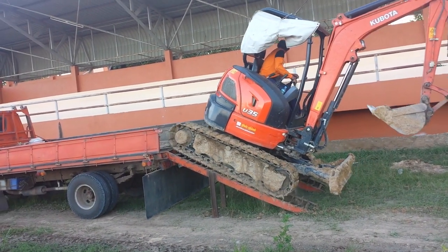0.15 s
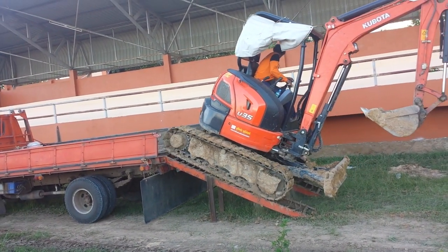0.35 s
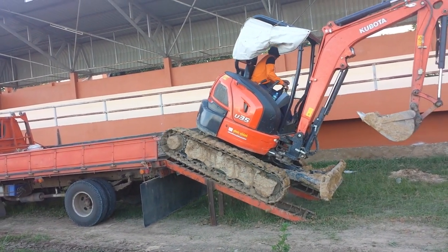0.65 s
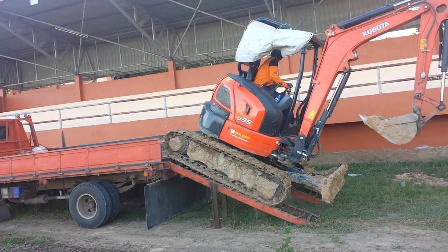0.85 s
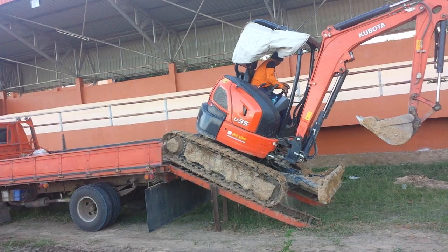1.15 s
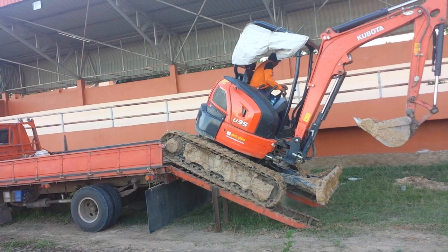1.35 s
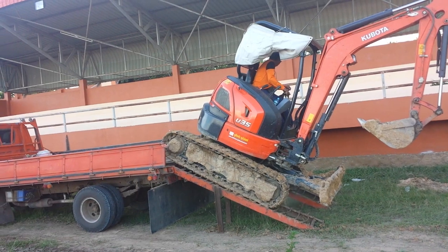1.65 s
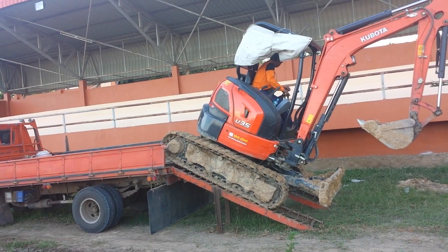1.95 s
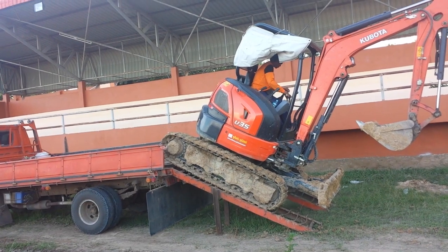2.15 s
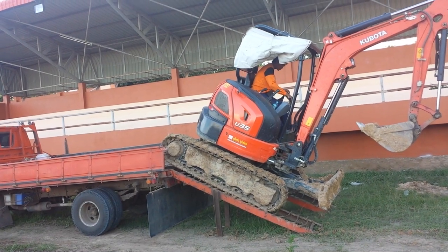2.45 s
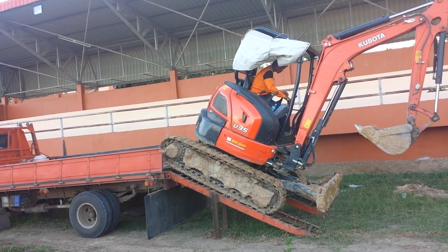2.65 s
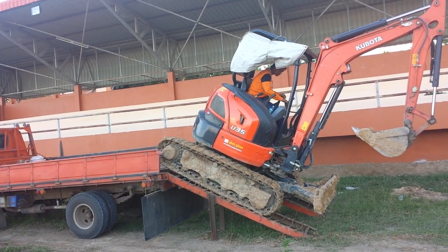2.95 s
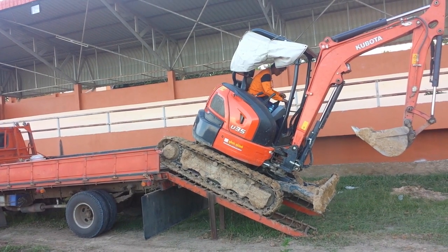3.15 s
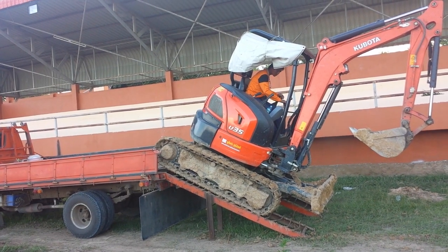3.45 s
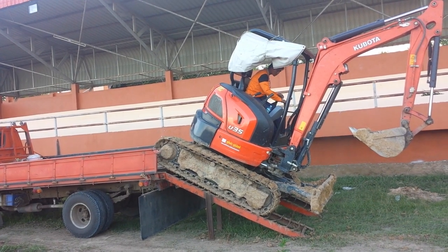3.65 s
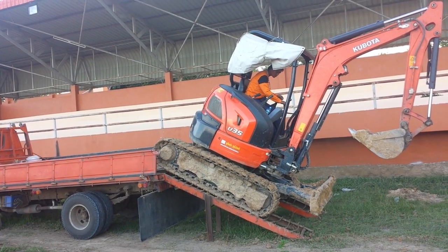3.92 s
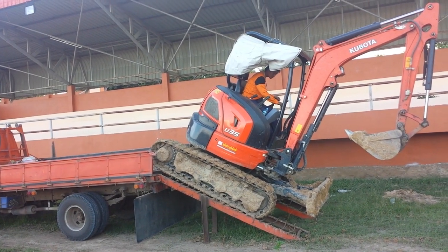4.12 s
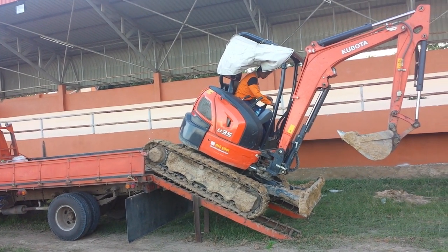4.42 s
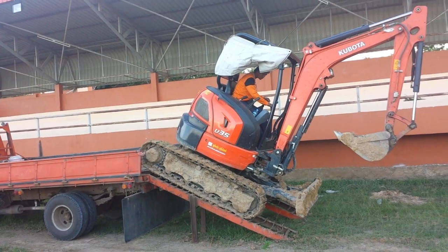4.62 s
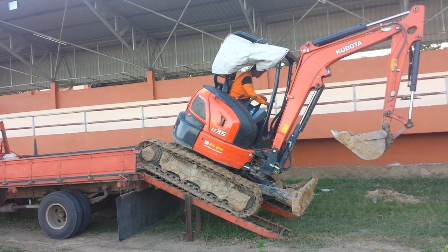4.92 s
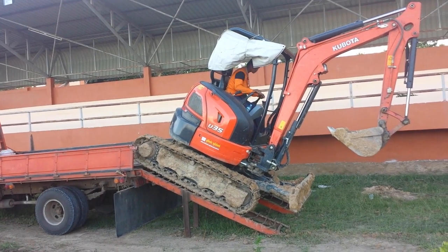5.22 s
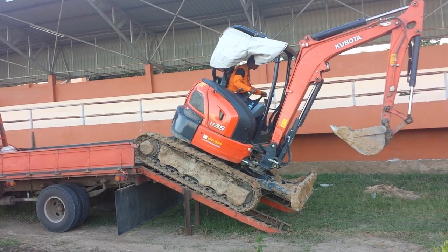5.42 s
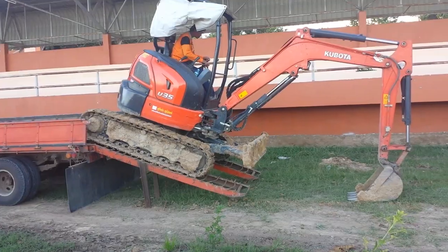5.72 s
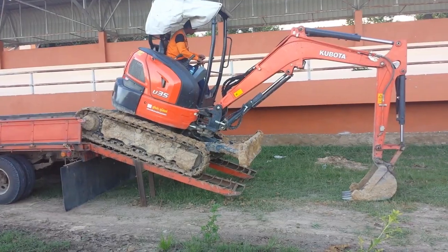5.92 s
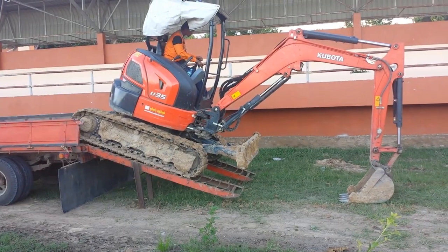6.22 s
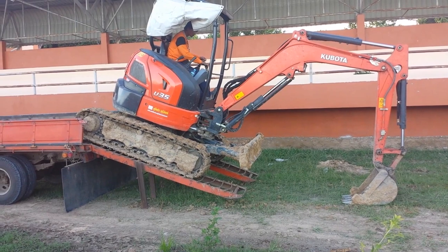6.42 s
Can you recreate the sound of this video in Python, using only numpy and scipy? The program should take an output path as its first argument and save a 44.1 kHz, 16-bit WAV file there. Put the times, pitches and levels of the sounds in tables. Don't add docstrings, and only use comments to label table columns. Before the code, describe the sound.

Metal tracks bang and grate early over a subdued diesel rattle, which swells into a steady hissing roar, broken by a short silence near the end.

```python
import sys
import numpy as np
from scipy import signal
from scipy.fft import rfft, irfft, next_fast_len
from scipy.io import wavfile
from scipy.ndimage import uniform_filter1d, map_coordinates

SR = 44100
rng = np.random.default_rng(int(sys.argv[2]) if len(sys.argv) > 2 else 0)


def rack_gain(trim_db):
    fader = np.asarray(trim_db, float)
    return 10 ** (fader / 20)


def transcribe(signal):
    frames = np.atleast_2d(signal).T
    limited = np.clip(frames, -1, 1)
    pcm = np.round(limited * 32767).astype(np.int16)
    wavfile.write(sys.argv[1], SR, pcm)


N = 289737
TIME = np.arange(N) / SR


def unit(x):
    return x / np.sqrt(np.mean(x ** 2) + 1e-20)


def along(points, hz):
    f, v = np.transpose(points)
    return np.interp(np.log(hz + 1), np.log(f + 1), v)


def curves(rows):
    s, *cols = np.transpose(rows)
    return [np.interp(TIME, s, c) for c in cols]


def wobble(rate_hz):
    knots = rng.standard_normal(int(N * rate_hz / SR) + 4)
    return map_coordinates(knots, [TIME * rate_hz])


def filtered(x, response):
    n = x.shape[-1]
    m = next_fast_len(n + 4096)
    return irfft(rfft(x, m) * response(np.fft.rfftfreq(m, 1 / SR)), m)[..., :n]


def modes(table):
    def response(f):
        total = 0
        for k, (hz, width, db) in enumerate(table):
            total = total + (-1) ** k * rack_gain(db) * 1j * f * width / (hz * hz - f * f + 1j * f * width)
        return total
    return response


def colour(points):
    below, above = (points[0][0] * 0.6, -120), (points[-1][0] * 1.3, -120)
    return lambda f: rack_gain(along([below] + list(points) + [above], f))


def patchy(patchy_db):
    z = signal.stft(rng.standard_normal((2, N)), nperseg=512)[2]
    field = uniform_filter1d(rng.standard_normal(z.shape[1:]), 6, 0)
    field = uniform_filter1d(field, 8, 1)
    return signal.istft(z * rack_gain(patchy_db * unit(field)), nperseg=512)[1][:, :N]


# start_s, cycle_rate_hz (four-stroke cycles)
CYCLE_RATE = [(0, 18.33), (1, 18.38), (2.2, 18.36), (2.65, 18.88), (3.4, 18.53), (4.2, 18.37), (5.6, 18.3),
              (5.97, 18.22), (6.57, 18.28)]
ORDER_LEVELS = [0.5, -28, -20, -11, -17.5, -22, -21, -28, -4.5, -13.5, -23.5, -19, -8, -10, -31.5, -20.5,
                -6, -3.5, -11, -7, -12, -13.5, -10.5]


def engine_tones(turn):
    tones = np.zeros(N)
    for order, db in enumerate(ORDER_LEVELS, 3):
        loose = 0.05 if order == 3 else 1
        phase = 2 * np.pi * (order * turn + rng.random()) + loose * 0.21 * wobble(5)
        level_db = db + loose * 3.4 * wobble(12)
        tones += rack_gain(level_db) * np.sqrt(2) * np.sin(phase)
    return tones


FIRING_STRENGTH = [0.51, 0.64, 0.52]
# pitch_hz, level_db (per Hz)
ROAR_COLOUR = [(28, -32), (42, -13), (85, -11), (125, -3.5), (160, -6), (210, -5), (300, -6.5), (380, -4.5),
               (450, -5), (580, -18.5), (720, -7.5), (830, -5), (1000, -17.5), (1300, -16.5)]
# pitch_hz, level_db (per Hz)
HISS_COLOUR = [(1400, -4), (1900, 3.5), (2250, -0.5), (2500, -7.5), (3700, -11.5), (5100, -11), (6500, -11),
               (7000, -3), (7500, -14.5), (9000, -21), (10000, -22), (12000, -26.5), (14300, -28),
               (15500, -43.5)]
# pitch_hz, width_hz, level_db
OIL_MODES = [(7100, 2200, 0)]


def engine_noise(turn, effort, ducked_db):
    strength = np.take(FIRING_STRENGTH, (3 * turn).astype(int) % 3)
    burst = strength * np.exp(-(3 * turn % 1) / 0.12)
    burst = burst / burst.mean() - 1

    def low(f, hz):
        return 1 / (1 + (f / hz) ** 8)

    hiss_colour = colour(HISS_COLOUR)
    roar = unit(filtered((1 + 0.04 * burst) * patchy(1.0), colour(ROAR_COLOUR)))
    knock = unit(filtered((1 + 0.09 * burst) * patchy(0.87), lambda f: hiss_colour(f) * low(f, 2800)))
    air = (1 + 0.02 * burst) * patchy(0.62)
    hiss = filtered(air, lambda f: hiss_colour(f) * (low(f, 7600) - low(f, 2250)))
    sizzle = filtered(air, lambda f: hiss_colour(f) * (1 - low(f, 7270)))
    oil = unit(filtered(patchy(1.5), lambda f: modes(OIL_MODES)(f) ** 2))

    bright = unit(hiss + rack_gain(2.5 * effort) * sizzle)
    hiss_db = -0.01 - 2 * effort + 0.06 * ducked_db
    noise = rack_gain(-1.06 + 7.0) * roar + rack_gain(hiss_db) * (rack_gain(-3) * knock + rack_gain(-0.5) * bright)
    return noise + rack_gain(-20 + 14 * effort) * oil


# pitch_hz, level_db
PUMP_WHINE = [(1104, -52)]
# centre_s, level_db, pitch_hz, half_length_s
CHASSIS_GROANS = [
    (3.93, -23.5, 117, 0.15),
    (6.22, -24.5, 172, 0.098),
    (2.566, -22.5, 430, 0.088),
]


def hum():
    out = np.zeros(N)
    for hz, db in PUMP_WHINE:
        level_db = db + 1.5 * wobble(3)
        out += rack_gain(level_db) * np.sqrt(2) * np.sin(2 * np.pi * hz * TIME + 0.3 * wobble(8))
    for s, db, hz, half_s in CHASSIS_GROANS:
        swell = np.exp(-((TIME - s) / half_s) ** 2)
        out += rack_gain(db) * swell * np.sqrt(2) * np.sin(2 * np.pi * hz * TIME)
    return out


# start_s, level_db
GAIN_RIDE = [(0, -33.5), (.16, -35), (.26, -43), (.4, -35), (.65, -35.5), (.87, -42.5), (1.25, -36.5),
             (1.5, -38.5), (1.95, -37.5), (2.1, -33.5), (2.25, -29), (2.45, -27), (2.7, -27), (4, -27),
             (5.6, -26.5), (5.97, -27.5), (6.57, -27)]
# start_s, effort_share
PRESSURE = [(0, 0.38), (2.2, .1), (3.5, .2), (4.5, 0.6), (4.9, .95), (5.6, .9), (5.97, .6), (6.57, .9)]


def engine():
    tone_db, = curves(GAIN_RIDE)
    effort, = curves(PRESSURE)
    ducked_db = tone_db.max() - tone_db
    turn = np.cumsum(curves(CYCLE_RATE)[0]) / SR
    noise = engine_noise(turn, effort, ducked_db)
    tones = engine_tones(turn) * rack_gain(-0.36 - 0.17 * ducked_db)
    steady = hum()
    return rack_gain(tone_db) * (noise + [tones, 0 * tones]) + [steady, 0 * steady]


# pitch_hz, level_db (per Hz)
GROUND_COLOUR = [(65, -8), (90, -4), (160, 0), (250, -3.5)]


def ground():
    rumble = unit(filtered(rng.standard_normal(N), colour(GROUND_COLOUR)))
    apart = rack_gain(curves(GAIN_RIDE)[0] - 11.5) * rumble
    return np.array([apart, -apart])


# pitch_hz, level_db (per Hz)
GRIT_COLOUR = [(2500, -2), (3600, -4.5), (4700, -3.5), (6100, -4.5), (7500, -2.5), (8500, -15.5),
               (10500, -17.5), (13000, -37.5), (15500, -38)]


def struck(table, t, rise_s, rasp=0):
    decay = rack_gain(-60 * t / 0.06) + 7 * rack_gain(-60 * t / 0.007)
    contact = rng.standard_normal((2, len(t))) * decay * (1 - np.exp(-t / rise_s))
    excited = [(hz, width, db + rng.normal(0, 3)) for hz, width, db in table]
    ring = filtered(contact, lambda f: modes(excited)(f) + rasp * colour(GRIT_COLOUR)(f))
    return ring / np.sqrt(np.mean(ring[:, :SR // 100] ** 2))


# pitch_hz, width_hz, level_db
BEAM_MODES = [(227, 100, -18.5), (287, 41, -10.5), (392, 51, -1.5), (416.5, 100, 0.5), (435, 86, -1)]
# pitch_hz, width_hz, level_db
PLATE_MODES = [(746, 70, -0.5), (830, 50, 3), (880, 33, 3), (930, 58, 2), (998, 35, 7), (1097, 52, 0),
               (1158, 86, -1), (1317, 45, -9.5)]
# pitch_hz, width_hz, level_db
RIB_MODES = [(1382, 60, -9.5), (1575, 64, -3.5), (1590, 110, -6), (1780, 86, -6.5), (1896, 49, -5.5),
             (2000, 18, -2.5), (2132, 80, -6), (2310, 49, -8.5), (2503, 40, -10.5)]
# pitch_hz, width_hz, level_db
LINK_MODES = [(4620, 54, -8), (5000, 110, 0), (5800, 65, -2.5), (6140, 160, 3), (6600, 53, -3.5),
              (7260, 120, 8), (8600, 180, -5.5)]
# start_s, level_db, hardness_db (harder rings link and high modes)
LINK_BLOWS = [(0.176, -19.5, 1), (0.199, -25, -1), (0.2081, -17, -0.5), (0.2435, -19.5, 12),
              (0.2682, -17, 4.5), (0.3107, -12.5, -9), (0.3241, -18.5, -15.5), (0.688, -39.5, 14.5),
              (0.715, -27, 8.5), (0.7547, -26, 0), (0.775, -21, -22), (0.8299, -18, 3.5),
              (0.8528, -21.5, -3.5), (0.9197, -12.5, 4), (0.9628, -20.5, 9.5), (0.989, -42, 12),
              (1.001, -13, 1.5), (1.029, -12, 3), (1.0638, -30.5, -4), (1.1249, -21, -11.5),
              (1.1443, -24.5, -11.5), (1.1892, -22, -0.5), (1.239, -25, -1), (1.372, -38, 8)]


def clanks():
    out = np.zeros((2, N + SR))
    t = np.arange(SR // 8) / SR
    for s, db, hard_db in LINK_BLOWS:
        beam_db = -27.5 - (1 - 0.27) * db + 0.5 - 7.5
        ring = rack_gain(beam_db) * struck(BEAM_MODES, t, 0.0053)
        ring += rack_gain(-0.24 * hard_db) * struck(PLATE_MODES, t, 0.00027)
        ring += rack_gain(0.5 + 0.17 * hard_db) * struck(RIB_MODES, t, 0.00025)
        ring += rack_gain(hard_db) * struck(LINK_MODES, t, 0.0001, rasp=0.56)
        out[:, round(s * SR):][:, :len(t)] += rack_gain(db - 6) * ring
    return out[:, :N]


# start_s (full grip), length_s, level_db, beam_weight_db, grit_db
TRACK_DRAGS = [(0.181, 0.0064, -27.5, -9, -8.5), (0.204, .07, -22.5, -23.5, 1.5),
               (0.32, 0.013, -29.5, -16.5, 0.5), (0.748, .012, -33, -2, -1.5),
               (.774, 0.0052, -25.5, 6.5, -6), (0.838, 0.0069, -31.5, 1, 5.2),
               (0.854, .012, -28.5, 2, -1.5), (0.926, .006, -29, -4, 6), (1.007, .003, -31, -6.5, 6.5),
               (1.035, 0.056, -29.5, 1.5, 0), (1.124, 0.027, -24.5, -8, -8),
               (1.172, 0.033, -22, -11.5, -8.5), (1.243, 0.024, -25, -3.5, -1)]


def scrape():
    out, grip = np.zeros((2, N)), np.zeros(N)
    grit = rack_gain(3 * wobble(250) + 1 * wobble(40))

    def dragged(response):
        return unit(filtered(grit * rng.standard_normal((2, N)), response))

    plate, beams, ribs = dragged(modes(PLATE_MODES)), dragged(modes(BEAM_MODES)), dragged(modes(RIB_MODES))
    rasp = dragged(lambda f: colour(GRIT_COLOUR)(f) + 0.39 * modes(LINK_MODES)(f))
    for s, length_s, db, weight_db, grit_db in TRACK_DRAGS:
        before_db = 1502.5 * np.clip(s - TIME, 0, 1)
        after_s = TIME - s - length_s
        bite = rack_gain(db - before_db - 378.5 * np.clip(after_s, 0, 1))
        bite += rack_gain(db - 13 - before_db - 98.5 * np.clip(after_s, 0, 2))
        body = plate + rack_gain(weight_db) * beams
        edge = rack_gain(0.48 * grit_db) * ribs + rack_gain(grit_db - 0.5) * rasp
        out += bite * (body + edge)
        grip += bite
    slow = uniform_filter1d(grip, round(0.19 * SR))
    return out + rack_gain(-3.5) * slow * unit(filtered(patchy(1.5), colour(ROAR_COLOUR)))


# pitch_hz, t60_s
SHED_DECAY = [(200, 0.97), (2000, 0.16), (10000, 0.053)]


def shed(x):
    hz, t, z = signal.stft(rng.standard_normal((2, SR // 2)), SR, nperseg=256)
    decay = rack_gain(-60 * t / along(SHED_DECAY, hz)[:, None])
    tail = signal.istft(z * decay, SR, nperseg=256)[1]
    late = np.pad(x, ((0, 0), (700, 0)))
    return signal.fftconvolve(late, tail / np.linalg.norm(tail[0]), axes=1)[:, :N]


# start_s, peak_db, pitch_hz
GRIT_TICKS = [
    (1.7379, -57, 12800),
    (1.948, -46, 10970),
    (5.3544, -40, 12000),
]


def ticks():
    out = np.zeros((2, N + SR))
    t = np.arange(SR // 8) / SR
    for s, db, hz in GRIT_TICKS:
        envelope = rack_gain(db - 60 * t / 0.09) * (1 - np.exp(-t / 0.00073))
        phase = rng.random((2, 1)) * 2 * np.pi
        out[:, round(s * SR):][:, :len(t)] += envelope * np.sin(2 * np.pi * hz * t + phase)
    return out[:, :N]


# pitch_hz, level_db
PORT_TILT = [(60, -3), (300, -2.5), (900, -4), (1400, -5.5), (2000, 7.5), (2500, 1.5), (3100, -3.5),
             (4000, -1.5), (5000, -4), (6000, 6.5), (7000, -12), (8000, -7.5), (11000, -6), (14000, -20)]
# pitch_hz, correlation
PORT_LIKENESS = [(60, 1), (130, 1), (300, 1), (900, 0.97), (1500, 0.73), (2500, 0.58), (3500, 0.43),
                 (4300, 0.61), (5500, 0.21), (7000, 0.29), (9000, 0.38), (15000, 0.17)]
# pitch_hz, phase_rad
PORT_LAG = [(60, .25), (140, .3), (300, .1), (1100, .55), (1700, 0), (2400, 2.4), (3600, 3), (5500, 6),
            (7200, 9.3), (12000, 12)]


def ports(pair):
    def split(f):
        angle = np.arccos(np.clip(along(PORT_LIKENESS, f), 0, 1)) / 2
        return np.array([np.cos(angle), np.sin(angle)])

    def skew(f):
        left = rack_gain(along(PORT_TILT, f) / 2) * np.exp(-0.5j * along(PORT_LAG, f))
        even = np.sqrt(2 / (abs(left) ** 2 + abs(left) ** -2))
        return even * np.array([left, 1 / left])

    shared, scattered = filtered(pair, split)
    return filtered(np.array([shared + scattered, shared - scattered]), skew)


# start_s, left_over_right_db
TURNING = [(0, 1.1), (1.5, 1.8), (4.5, 1.2), (5.6, 0.8), (5.97, 2), (6.57, 0.7)]


def scene():
    steel = clanks() + scrape() + ticks()
    heard = ports(engine() + steel + rack_gain(-18.0) * shed(steel)) + ground()
    pan_db, = curves(TURNING)
    return heard * rack_gain([pan_db / 2, -pan_db / 2])


def low_pass(x):
    return signal.sosfilt(signal.butter(12, 15660, fs=SR, output="sos"), x)


# start_s, gain
SCENE_CHANGE = [
    (5.604, 1),
    (5.6185, .3),
    (5.6195, 0),
    (5.9705, 0),
    (5.972, .035),
    (6.23, 1),
]


def record(dry):
    gain, = curves(SCENE_CHANGE)
    mix = np.clip(dry * gain, -1, 1)
    return low_pass(mix)


dry = scene()
out = record(dry)
transcribe(out)
```